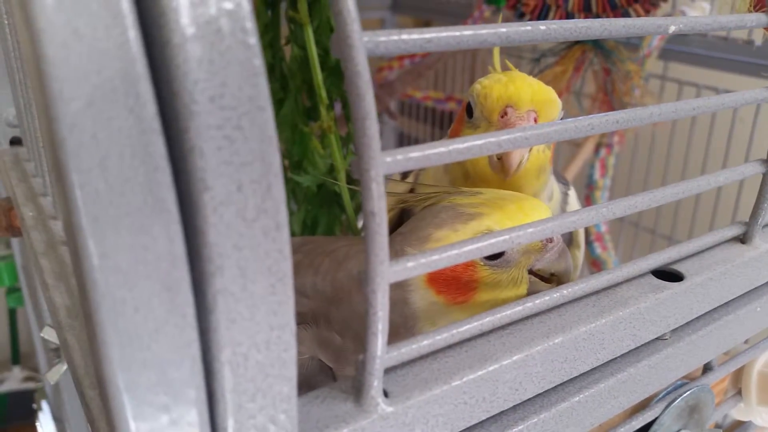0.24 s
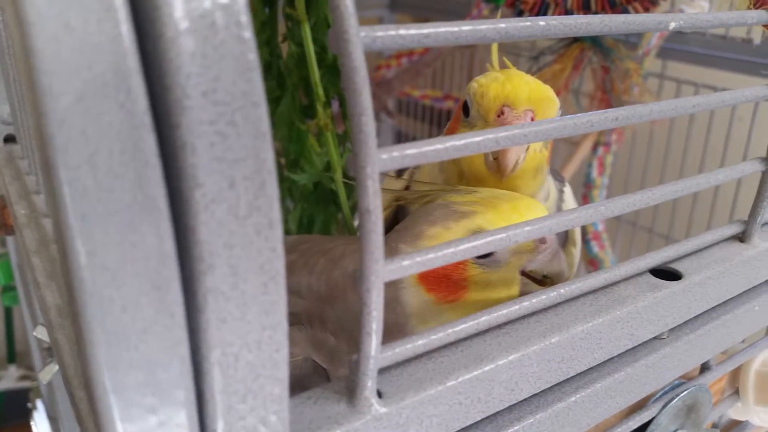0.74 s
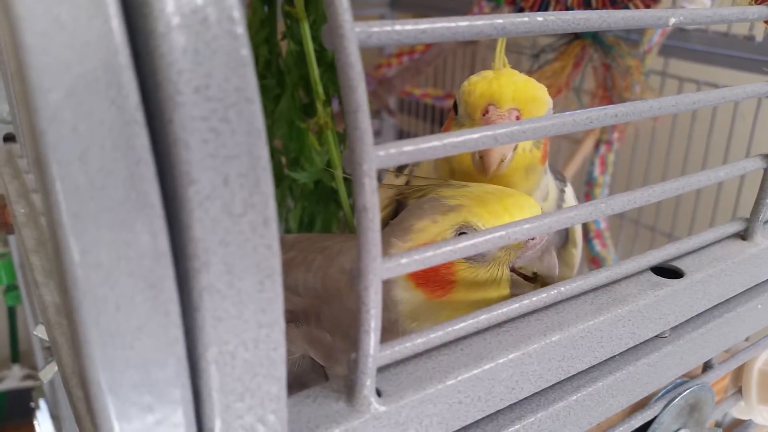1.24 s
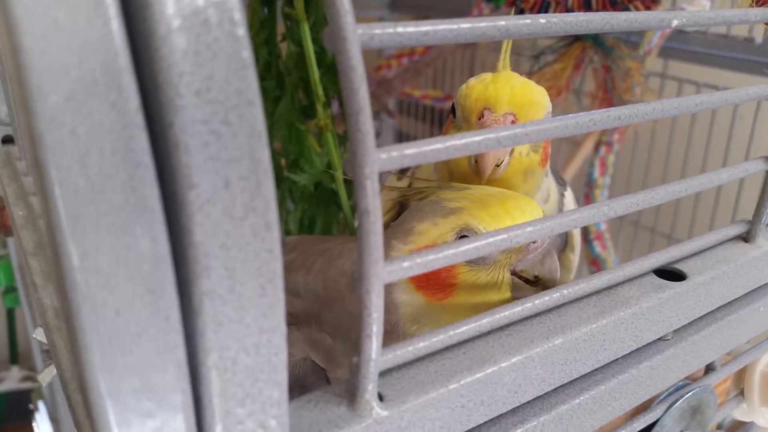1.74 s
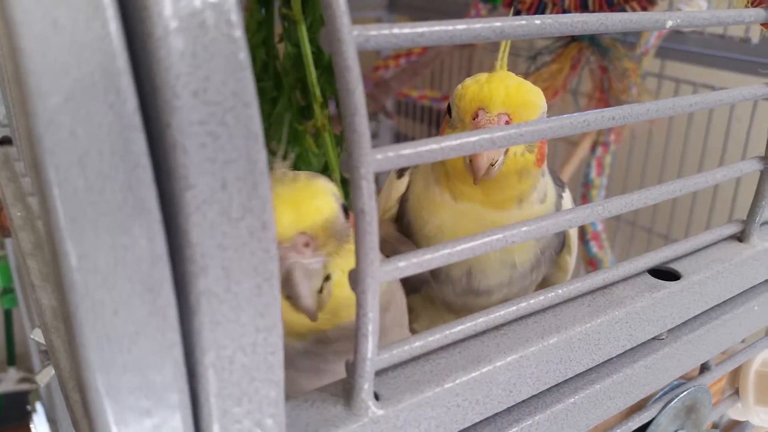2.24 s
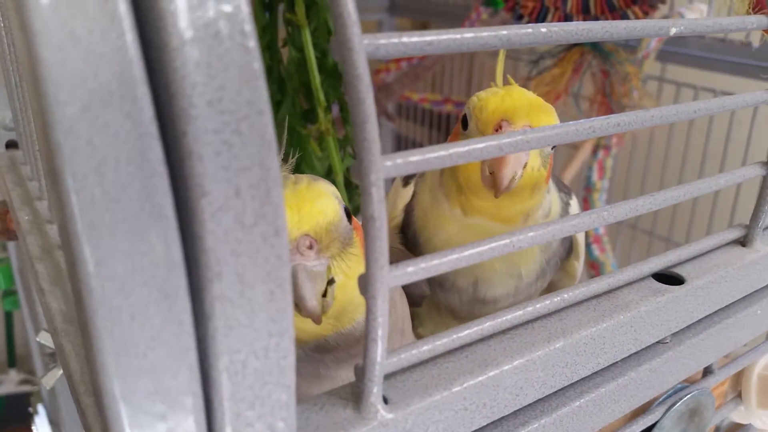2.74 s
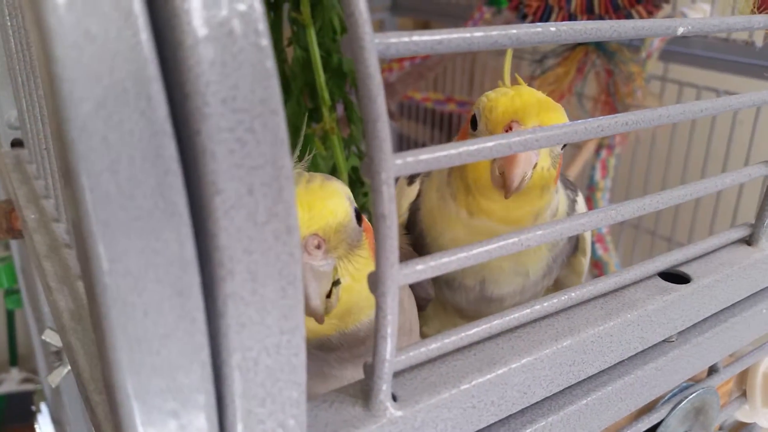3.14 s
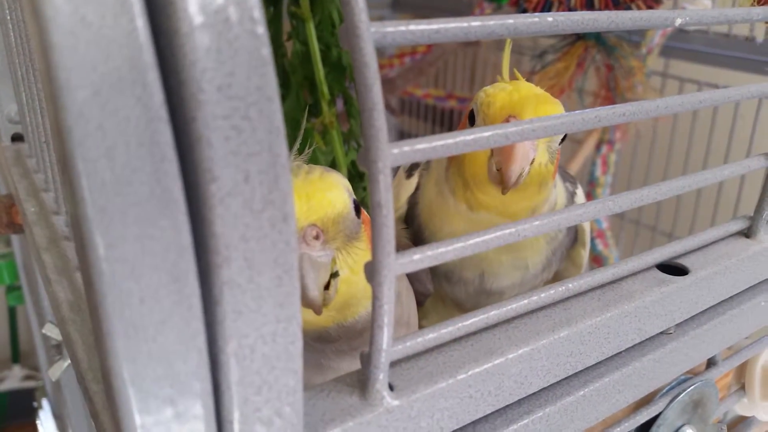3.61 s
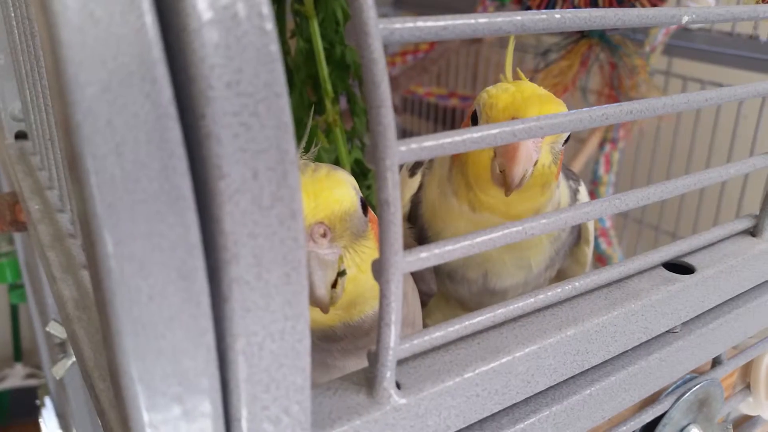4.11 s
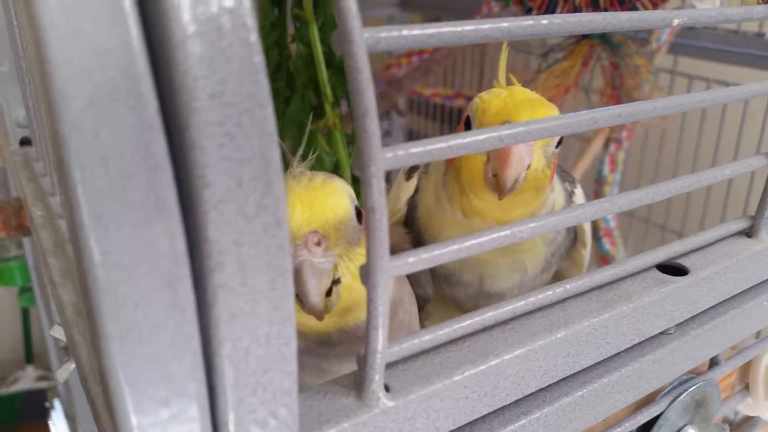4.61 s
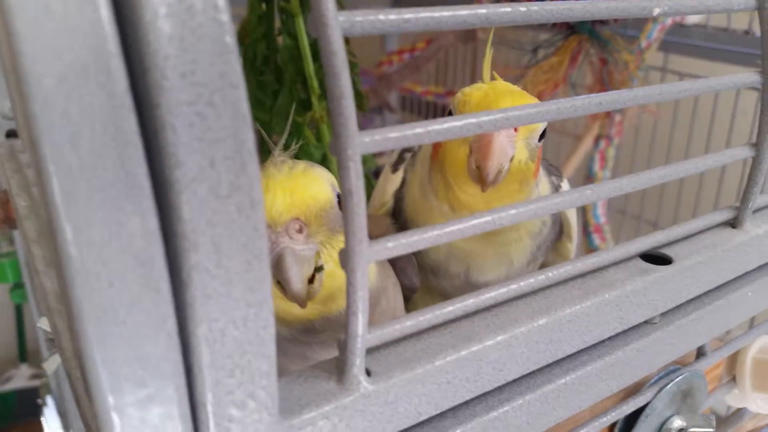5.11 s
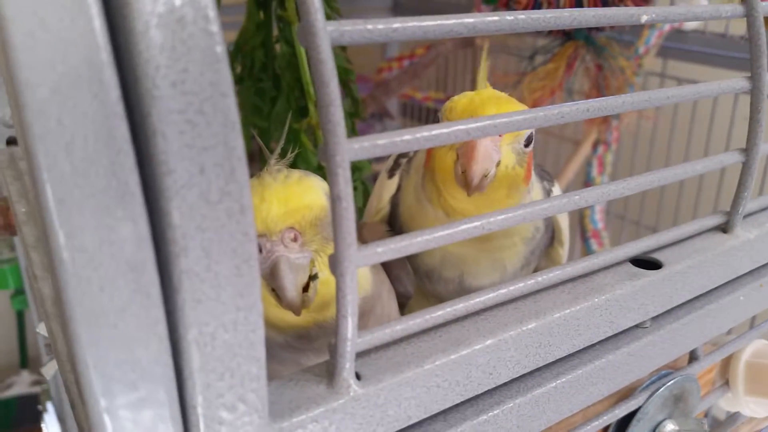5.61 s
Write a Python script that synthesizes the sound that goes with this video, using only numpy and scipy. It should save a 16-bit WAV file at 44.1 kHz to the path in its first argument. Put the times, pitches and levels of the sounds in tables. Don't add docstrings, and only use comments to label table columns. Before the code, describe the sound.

A small pet parrot sings in a steel cage, very close to a phone in a furnished living room. At 0 s it gives a loud, wide climbing whistle, then about five softer, lower chirps until roughly 1 s. A pause of about a second follows, the low rumble and faint hiss fading down. Just after 2 s a very faint note leads into quick runs of short, clear whistled chirps, five or so per second, with small gaps around 2.4, 4.5 and 4.9 s. Each rises slightly and collapses abruptly in pitch. Some are hoarse and fluttery, most strongly around 5.0 to 5.5 s; the last two, near 5.6 and 5.8 s, are strong. Light claw and beak ticks and soft perch knocks are barely audible, the firmest near 4.1 s. The room answers briefly, while rumble swells slightly near 4.2 and 5.2 s and thin hiss leans left.

```python
import sys
import numpy as np
from scipy import signal
from scipy.fft import rfft, irfft, next_fast_len
from scipy.io import wavfile
from scipy.ndimage import uniform_filter1d, map_coordinates

SR = 44100
rng = np.random.default_rng(int(sys.argv[2]) if len(sys.argv) > 2 else 0)


def volts(x):
    e = np.asarray(x, float) / 20
    return 10 ** e


def digitize_waveform(pressure):
    field = np.atleast_2d(pressure).T
    bounded = np.clip(field, -1, 1)
    quanta = np.round(bounded * 32767).astype(np.int16)
    wavfile.write(sys.argv[1], SR, quanta)


N = 258426

# start in seconds, length in seconds, first pitch in Hz, crest pitch in Hz, level in dB.
ARCHES = [(0.227, .087, 1400, 1730, -16.5), (0.435, .06, 1243, 1345, -21.5),
          (0.949, 0.067, 1265, 1345, -23.5), (2.003, .037, 1311, 1307, -40),
          (2.206, .055, 1370, 1944, -17.5), (2.349, .083, 1327, 1620, -14.5),
          (2.71, .061, 1225, 1395, -20.5), (2.864, .073, 1360, 1416, -19.5), (3.028, .067, 1357, 1625, -16),
          (3.189, .071, 1342, 1640, -14.5), (3.371, .079, 1301, 1595, -15.5),
          (3.544, .089, 1334, 1589, -16), (3.734, .077, 1334, 1552, -17.5), (4.099, 0.084, 1350, 1656, -16),
          (4.29, 0.069, 1315, 1496, -18), (4.647, .075, 1360, 1635, -16), (4.834, 0.073, 1301, 1531, -17.5),
          (5.606, .067, 1528, 1716, -14), (5.788, .065, 1400, 1605, -14.5)]
# start in seconds, length in seconds, first pitch in Hz, crest pitch in Hz, level in dB.
RAMPS = [
    (0.007, 0.11, 1413, 2345, -12.5),
    (3.915, 0.086, 1369, 1612, -16),
    (4.462, 0.074, 1406, 1511, -19),
    (5.034, .091, 1357, 1786, -15),
    (5.408, 0.087, 1411, 1742, -15),
]
# start in seconds, length in seconds, crest pitch in Hz, last held pitch in Hz, level in dB.
SAGS = [
    (0.594, 0.069, 1291, 1250, -22.5),
    (0.767, 0.07, 1283, 1190, -23),
    (2.54, 0.072, 1500, 1271, -18.5),
    (5.23, .092, 1566, 1276, -14),
]
# start in seconds, pitch in Hz, level in dB.
MURMUR = (2.139, 1315, -31.5)
# time of a central dip in seconds,
# half length in seconds, depth as a share of the pitch, dips per second, rasp in dB.
HOARSE = [(0.074, .05, 0.021, 160, 4), (2.189, 0.042, 0.062, 53, -11.5), (2.238, .025, 0.062, 65, 4.5),
          (2.388, 0.06, .06, 105, 3), (2.585, 0.036, .06, 89, 6.5), (4.866, .04, .02, 71, 1.5),
          (5.066, 0.04, 0.084, 72, -1), (5.277, 0.049, 0.089, 110, 15.5), (5.453, .04, 0.083, 92, 3.5),
          (5.643, 0.063, .02, 56.8, 7)]
# time in seconds, second harmonic over the first in dB,
# extra brightness in dB.
BEAK_FACING = [(0.04, -2.5, 2.1), (0.3, -6, 11.8), (0.42, -26, -0.6), (1.0, -28.5, -7.5), (2.2, -21.5, 4),
               (2.74, -23.5, 0), (3.3, -24, 4.8), (3.8, -23, 3.9), (4.5, -21, 1), (4.75, -23, 0.7),
               (5.1, -20, 4.3), (5.252, -11, -1.5), (5.31, -27, 16.5), (5.45, -18.5, 0.7),
               (5.82, -23, -3.5)]
# pitch in Hz, high overtones over the level in dB.
BRIGHTNESS = [(1200, -44.5), (1330, -36.5), (1450, -24.5), (1600, -24), (2300, -16.5)]
# frequency in Hz, gain in dB.
TRACT = [(2400, 13), (3300, -6), (4000, -13), (5000, -15.5), (5700, -18), (6400, -28), (7100, -19.5),
         (7800, -10.5), (9300, -20.5), (10200, -11.5), (11300, 3), (12500, -8.5), (14000, -9.5),
         (15800, -13)]
# frequency in Hz, gain in dB.
BREATH = [(300, -42), (900, -6), (1600, 8), (3200, -10), (5000, -14.5), (6000, -53.5)]
# time in seconds, peak level in dB.
BUMPS = [
    (2.718, -44.5),
    (3.017, -38),
    (4.134, -33.5),
    (5.269, -62),
]
# time in seconds, level in dB, frequency in Hz, time to
# die by 60 dB in seconds.
TICKS = [(2.075, -70, 9000, 0.019), (2.342, -38, 930, 0.072), (2.536, -54, 7100, 0.011),
         (4.134, -48, 295, 0.059), (4.838, -38.5, 676, 0.019), (5.017, -48, 9900, 0.0096),
         (5.221, -61, 9700, 0.009), (5.235, -43.5, 756, 0.052), (5.295, -43, 920, 0.059)]
# start in seconds, length in seconds, frequency in Hz, level in dB.
BAR_HUM = (.3, .12, 480, -60.5)
# delay in seconds, level in dB.
WALLS = [(.0031, -19), (.0074, -19), (.0118, -20), (.0173, -21), (.0236, -22)]
# frequency in Hz, time to die by 60 dB in seconds.
ROOM_DECAY = [(800, 0.18), (1600, 0.5), (2800, 0.51), (6000, 0.15), (12000, 0.39)]
# frequency in Hz, gain in dB.
ROOM_COLOUR = [(1500, -0.5), (2700, 4), (4000, -4), (9000, -1.5), (15000, -12.5)]
# frequency in Hz, left minus right in dB.
PORT_BALANCE = [(400, 0), (1000, -5), (1350, -9), (1700, -8), (2300, 0), (3000, 4), (4800, 8), (6200, 6),
                (7800, -1), (9000, -3), (10000, -1), (11200, -7), (13000, -2), (15200, 2)]
# frequency in Hz, left lead in radians.
PORT_LEAD = [(0, 0), (1350, .45), (1650, .9), (2500, 1), (3000, .65), (4700, 1.5), (6200, 2.6), (7800, 3),
             (9000, 4), (11300, 4), (13500, 4.2), (16200, 5)]
# time in seconds, extra left lead in microseconds.
HEAD_TURN = [(0, -3), (.5, 3), (1, 12), (2.2, 11), (2.7, 1), (4.15, 0), (4.7, 12), (5.1, 19), (5.45, 19),
             (5.65, 32), (5.85, 46)]
# frequency in Hz, level in dB per Hz.
RUMBLE = [(12, -46.5), (20, -7), (38, -3), (52, -8.5), (64, -7.5), (92, -4.5), (265, -13.5), (300, -16),
          (409, -20), (1670, -26.5), (2800, -44.5), (3640, -80), (6160, -120)]
# frequency in Hz, likeness from 0 to 1.
RUMBLE_ALIKE = [(60, 0.8), (150, .72), (350, 0.5), (700, 0.45), (1500, 0)]
# frequency in Hz, level in dB per Hz.
HISS = [(1650, -54), (2800, -18.5), (4060, -1.5), (5090, -10), (5930, -26), (7170, -41.5), (7890, -29.5),
        (8420, -41.5), (9130, -37.5), (16000, -21.5)]
# time in seconds, half length in seconds, swell in dB.
HANDLING = [
    (4.19, 0.27, 3),
    (5.2, 0.21, 3.5),
]

CREST_SHARE, EARLY_SHARE = 0.63, 0.24
CREST_S, FALL_POWER = 0.03, 2.8
RAMP_POWER, RAMP_CREST_S, RAMP_FALL_POWER = 1.25, 0.026, 2.4
BOW, LAG_PER_KHZ = 1, 1
SAG_ONSET_HZ, SAG_S = 1360, 0.037
FALL_HZ, FALL_FOLLOWS = 1082, 0.37
SAG_DROP, SAG_FADE_POWER = 0.4, 0.71
EFFORT_DB_PER_KHZ, SWELL_POWER = 15.5, 2
SAG_DB_PER_KHZ, DROP_DB_PER_KHZ, FALL_DB = 21.5, 12, 14
ONSET_DB, ONSET_S = 3.5, 0.0068
BREATHY_STARTS_S, BREATHY_DB, BREATHY_S = (2.349, 5.234), 14, 0.021
SHUT_DB_PER_KHZ = 30
RASP_BRIGHT, RASP_VALLEY = 0.44, 0.61
RASP_HZ, RASP_WIDTH_HZ, RASP_DB = 6176, 270, -59.5
HEARD_DB, CLOSE_S, GLIDE_S = -30, 0.34, 0.27
RUMBLE_DB, HISS_DB = -53, -64.5
SHUT_RUMBLE_DB, SHUT_HISS_DB = -7.5, -12
SPLIT_HZ, SHUT_UPPER_DB = 350, -9
SETTLE_DB, SETTLE_S = 16, 0.29
TOP_HZ = 15880


def unit(x):
    return x / np.sqrt(np.mean(x ** 2) + 1e-20)


def along(points, hz):
    f, v = np.transpose(points)
    return np.interp(np.log(hz + 1), np.log(f + 1), v)


def wobble(rate):
    knots = rng.standard_normal(int(N * rate / SR) + 4)
    return map_coordinates(knots, [np.arange(N) * rate / SR])


def filtered(x, response):
    m = next_fast_len(N + SR // 2)
    return irfft(rfft(x, m) * response(np.fft.rfftfreq(m, 1 / SR)), m)[..., :N]


def phrase():
    rows = [(s, n, a, top, top, db, n * CREST_SHARE, False) for s, n, a, top, db in ARCHES]
    rows += [(s, n, a, top, top, db, n - RAMP_CREST_S, True) for s, n, a, top, db in RAMPS]
    rows += [(s, n, min(top, SAG_ONSET_HZ), top, low, db, n * EARLY_SHARE, False)
             for s, n, top, low, db in SAGS]
    notes = []
    for start, length, first, top, low, db, crest, is_ramp in sorted(rows):
        sags = low < top
        t = np.linspace(0, length, num=40)
        u = np.clip(t / crest, 0, 1)
        if is_ramp:
            climb = u ** RAMP_POWER
            fall_s, fall_power = RAMP_CREST_S, RAMP_FALL_POWER
        else:
            climb = np.sin(np.pi / 2 * u) ** (BOW + LAG_PER_KHZ * (top - first) / 1000)
            fall_s, fall_power = CREST_S, FALL_POWER
        sag = (top - low) * np.sin(np.pi / 2 * np.clip((t - crest) / SAG_S, 0, 1)) ** 2
        held = first + (top - first) * climb - sag
        fall = np.clip(1 - (length - t) / fall_s, 0, 1) ** fall_power
        depth = max(low - FALL_HZ * (low / 1600) ** FALL_FOLLOWS, 0)
        drop = fall * depth * (SAG_DROP if sags else 1)

        breathy = min(abs(start - b) for b in BREATHY_STARTS_S) < 0.01
        onset_depth, onset_s = (BREATHY_DB, BREATHY_S) if breathy else (ONSET_DB, ONSET_S)
        level = db - FALL_DB * fall ** (SAG_FADE_POWER if sags else 2)
        level -= onset_depth * np.exp(-t / onset_s)
        level -= EFFORT_DB_PER_KHZ * (top - first) / 1000 * (1 - u) ** SWELL_POWER
        level -= (SAG_DB_PER_KHZ * sag + DROP_DB_PER_KHZ * drop) / 1000
        note = np.c_[start + t, held - drop, level, drop / 1000]
        if 0 < start - MURMUR[0] < 0.1:
            note = np.r_[[(*MURMUR, 0)], note]
        notes.append(note)
    return notes


def bird():
    t, notes = np.arange(N) / SR, phrase()
    when, *paths = np.concatenate(notes).T
    pitch, level_db, fallen = (uniform_filter1d(np.interp(t, when, p), size=60) for p in paths)
    sounding, opened = np.zeros(N), np.zeros(N)
    for note in notes:
        start, end = note[0][0], note[-1][0]
        sounding += np.clip(np.minimum((t - start) / 0.003, (end - t) / 0.003), 0, 1)
        opened += np.clip((t - start) / 0.023, 0, 1) * (t < end)

    warble, rasp_db = 0.008 * wobble(130), np.zeros(N)
    for mid, half, depth, rate, db in HOARSE:
        swell = np.clip(3 - 3 * ((t - mid) / half) ** 2, 0, 1)
        dips = np.exp(2.2 * (np.cos(2 * np.pi * rate * (t - mid)) - 1))
        warble += swell * depth * (0.37 - dips + 0.086 * wobble(200))
        rasp_db += swell * db
        level_db -= 0.25 * swell * db * dips

    when, *beak = np.transpose(BEAK_FACING)
    beak_db, facing_db = (np.interp(t, when, c) for c in beak)
    bright_db = along(BRIGHTNESS, pitch) + facing_db + RASP_BRIGHT * rasp_db + 3 * wobble(60)
    pitch = pitch * (1 + warble)
    phase = 2 * np.pi * np.cumsum(pitch) / SR
    voice = volts(level_db - 3 + 1.1 * wobble(90)) * np.sin(phase)
    for k in range(2, 15):
        hz = k * pitch
        high = np.clip((hz - 5500) / 2500, 0, 1)
        tone_db = level_db + (1 - high) * (beak_db - 0.5) + high * bright_db
        tone_db += along(TRACT, hz) + 2.64 * wobble(140)
        tone_db += RASP_VALLEY * rasp_db * np.exp(-((hz - 7600) / 2500) ** 4)
        tone_db -= SHUT_DB_PER_KHZ * fallen
        voice += volts(tone_db) * (1 - high + high * opened) * np.sin(k * phase) * (hz < 17000)

    puffs = (1 + 1.8 * np.sin(phase)) * rng.standard_normal(N)
    high_air = unit(filtered(puffs, lambda hz: volts(along(TRACT, hz)) * (hz > 5800)))
    low_air = unit(filtered(puffs, lambda hz: volts(along(BREATH, hz))))
    whistle = unit(filtered(puffs, lambda hz: np.exp(-((hz - RASP_HZ) / RASP_WIDTH_HZ) ** 2)))
    air = volts(bright_db - 16 - rasp_db / 3) * opened * high_air
    air += volts(-41.5) * low_air + volts(RASP_DB + rasp_db) * whistle
    return sounding * (voice + volts(level_db + rasp_db) * air)


def cage():
    t = np.arange(SR // 8) / SR
    out = np.zeros(N + len(t))

    def place(start, sound):
        out[round(start * SR):][:len(t)] += sound

    for start, db in BUMPS:
        thud = np.sin(2 * np.pi * 120 * t) * (1 - np.exp(-t / 0.006))
        place(start, volts(db - 0.5 - 60 * t / 0.072) * thud)
    for start, db, hz, t60 in TICKS:
        band = signal.butter(2, [hz / 1.58, hz * 1.86], "band", fs=SR)
        scrape = unit(signal.lfilter(*band, rng.standard_normal(len(t))))
        place(start, volts(db - 60 * t / t60) * (1 - np.exp(-t / 0.001)) * scrape)
    start, length, hz, db = BAR_HUM
    swell = np.sin(np.pi * np.clip(t / length, 0, 1))
    place(start, volts(db) * swell * np.sin(2 * np.pi * hz * t))
    return out[:N]


def ports(x):
    def half(hz):
        lead = np.interp(hz, *np.transpose(PORT_LEAD))
        return volts(along(PORT_BALANCE, hz) / 2) * np.exp(0.5j * lead)

    left, right = filtered(x, lambda hz: np.array([half(hz), 1 / half(hz)]))
    shift = np.interp(np.arange(N) / SR, *np.transpose(HEAD_TURN)) * SR / 1e6
    left = map_coordinates(left, [np.arange(N) + shift], order=3, mode="nearest")
    return np.array([left, right])


def room(x):
    out = np.zeros((2, N + SR))
    starts = [0] + [int(n[0][0] * SR) for n in phrase()[1:]] + [N]
    for a, b in zip(starts, starts[1:]):
        hz, t, z = signal.stft(rng.standard_normal((2, SR // 2)), SR, nperseg=256)
        decay_db = along(ROOM_COLOUR, hz)[:, None] - 60 * t / along(ROOM_DECAY, hz)[:, None]
        tail = signal.istft(z * volts(decay_db), SR, nperseg=256)[1]
        answer = volts(-15.0) * np.pad(tail / np.linalg.norm(tail[0]), ((0, 0), (400, 0)))
        for delay, db in WALLS:
            at = (delay * SR + rng.uniform(-12, 12, 2)).astype(int)
            answer[[0, 1], at] += volts(db) * rng.choice([-1, 1], 2)
        echo = signal.fftconvolve(x[None, a:b], answer, axes=1)
        out[:, a:a + echo.shape[1]] += echo
    return out[:, :N] * volts(1.8 * wobble(30))


def suppressor():
    t = np.arange(N) / SR
    heard = [(n[0, 0], n[-1, 0]) for n in phrase() if n[:, 2].max() > HEARD_DB]
    starts, ends = np.transpose(heard)
    since = t - ends[np.clip(np.searchsorted(starts, t) - 1, 0, None)]
    return uniform_filter1d(np.clip(since / CLOSE_S, 0, 1) ** 2, int(GLIDE_S * SR))


def background():
    t, shut = np.arange(N) / SR, suppressor()

    def mid_and_side(hz):
        angle = np.arccos(np.clip(along(RUMBLE_ALIKE, hz), -1, 1)) / 2
        return volts(along(RUMBLE, hz)) * [np.cos(angle), np.sin(angle)]

    mid, side = filtered(rng.standard_normal((2, N)), mid_and_side)
    rumble = unit(np.array([mid + side, mid - side])) * volts([[-0.5], [0.5]])
    upper = filtered(rumble, lambda hz: 1 / (1 + (SPLIT_HZ / (hz + 1)) ** 2))
    rumble = rumble - upper * (1 - volts(SHUT_UPPER_DB * shut))
    rumble_db = RUMBLE_DB + SHUT_RUMBLE_DB * shut + 1.6 * wobble(2.1)
    for mid_s, half_s, db in HANDLING:
        rumble_db += db * np.exp(-((t - mid_s) / half_s) ** 2)

    hiss = unit(filtered(rng.standard_normal((2, N)), lambda hz: volts(along(HISS, hz))))
    hiss = hiss * volts([[9], [-9]])
    hiss_db = HISS_DB + SHUT_HISS_DB * shut + SETTLE_DB * np.exp(-t / SETTLE_S)
    return volts(rumble_db) * rumble + volts(hiss_db) * hiss


def scene():
    near = bird() + cage()
    answer = room(near) * volts([[-1.5], [1.5]])
    return volts(5.0) * (ports(near) + answer) + background()


def top_cut(x):
    return signal.sosfilt(signal.butter(12, 16660, fs=SR, output="sos"), x)


def record(dry):
    mix = filtered(dry, lambda hz: 1 / (1 + (hz / TOP_HZ) ** 120))
    return top_cut(mix)


dry = scene()
out = record(dry)
digitize_waveform(out)
```